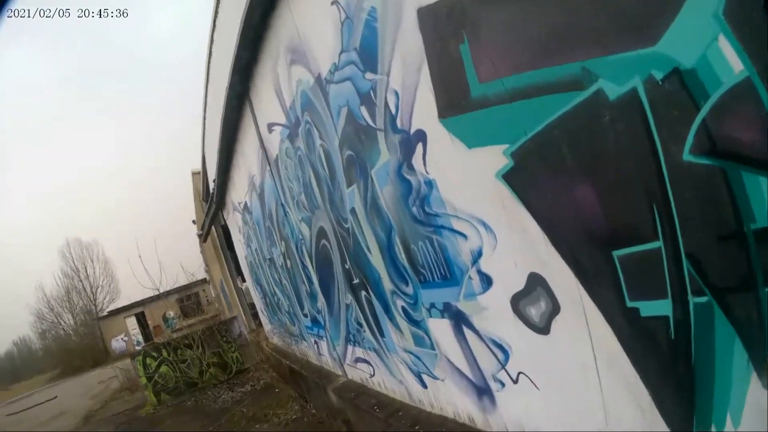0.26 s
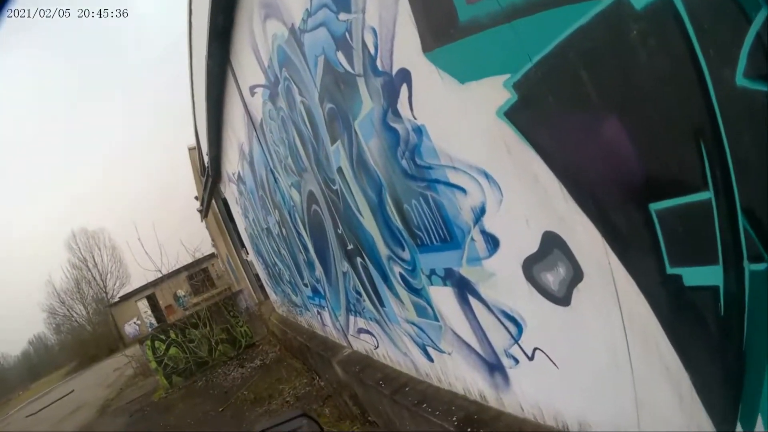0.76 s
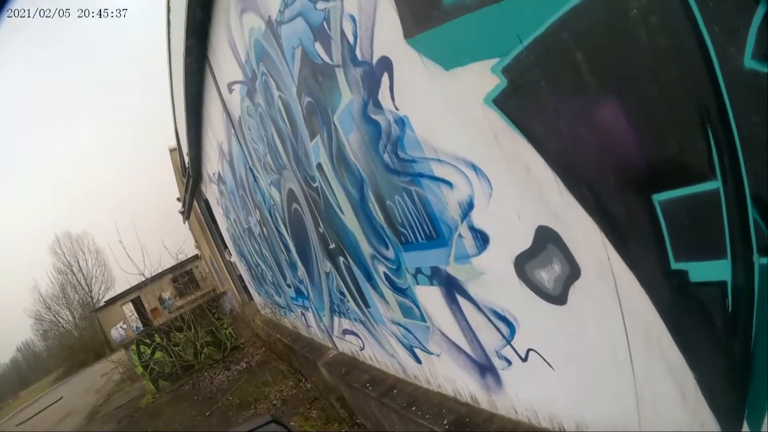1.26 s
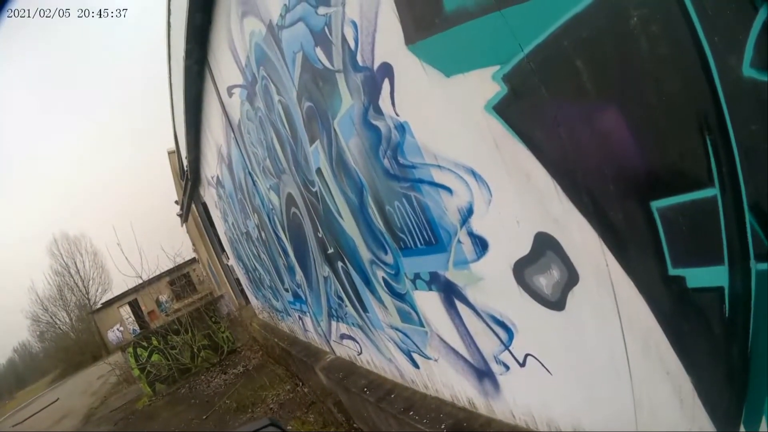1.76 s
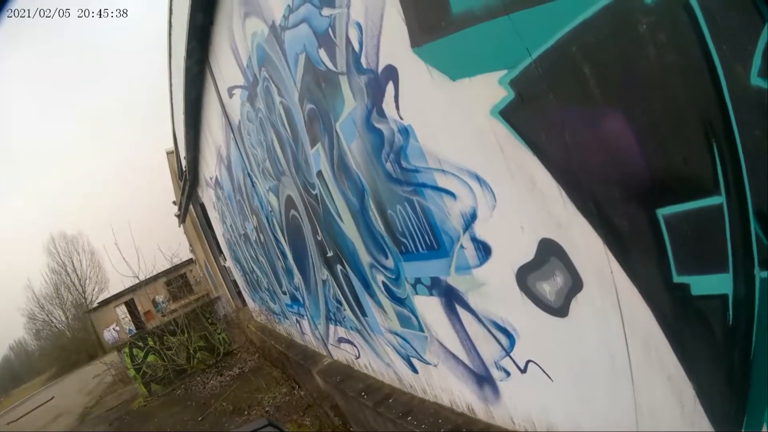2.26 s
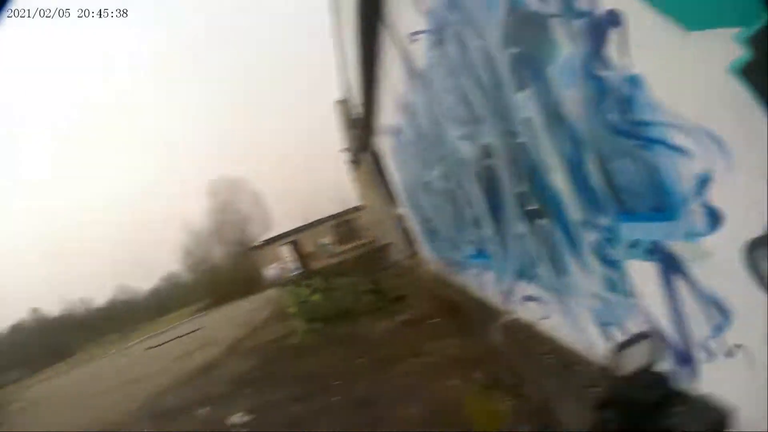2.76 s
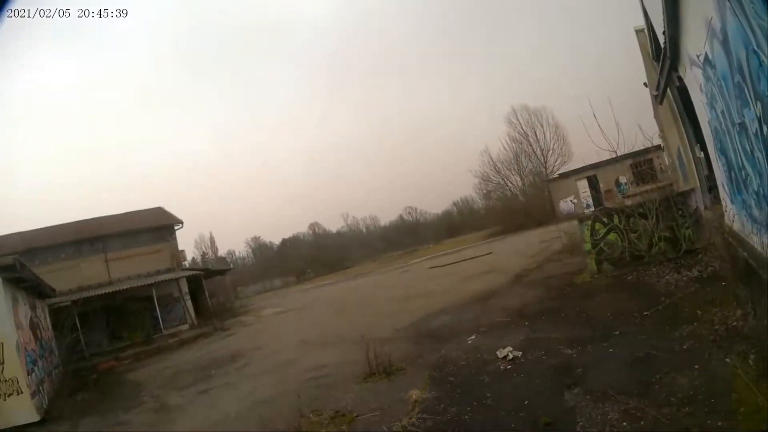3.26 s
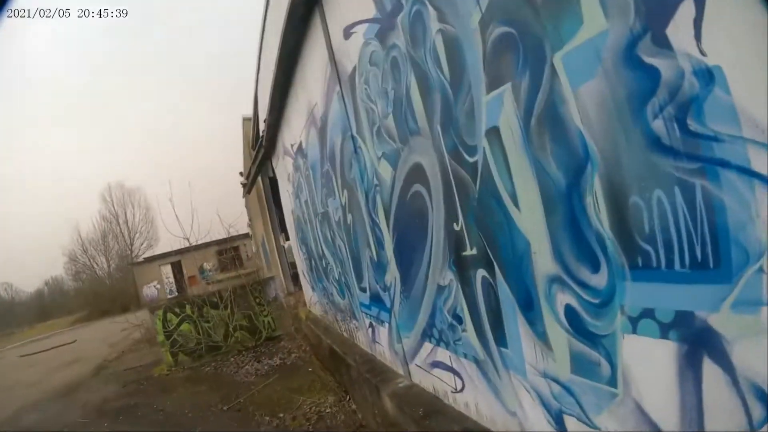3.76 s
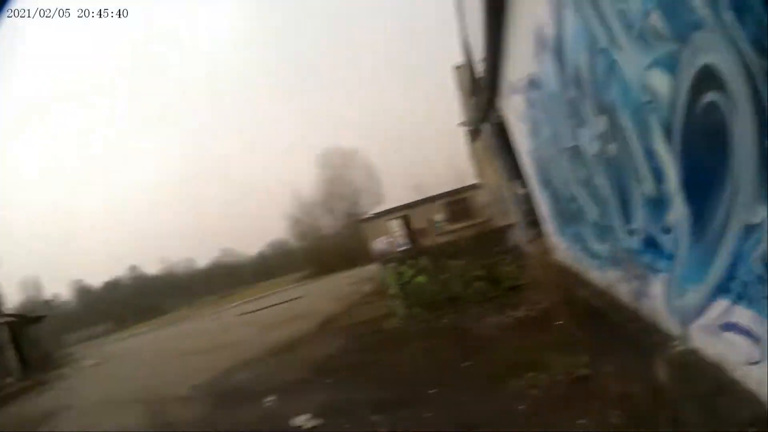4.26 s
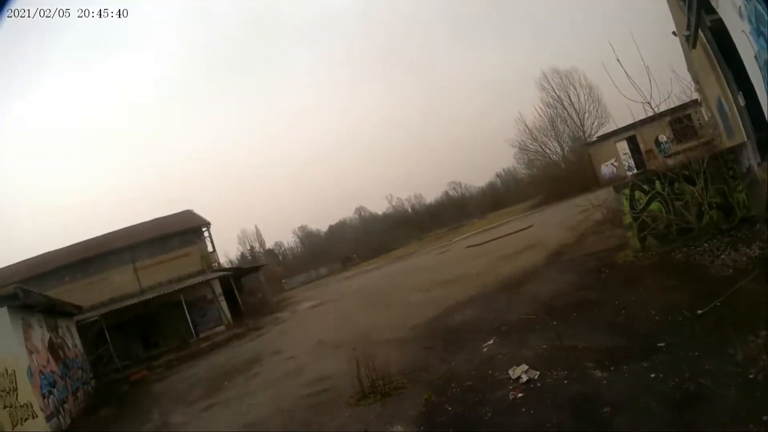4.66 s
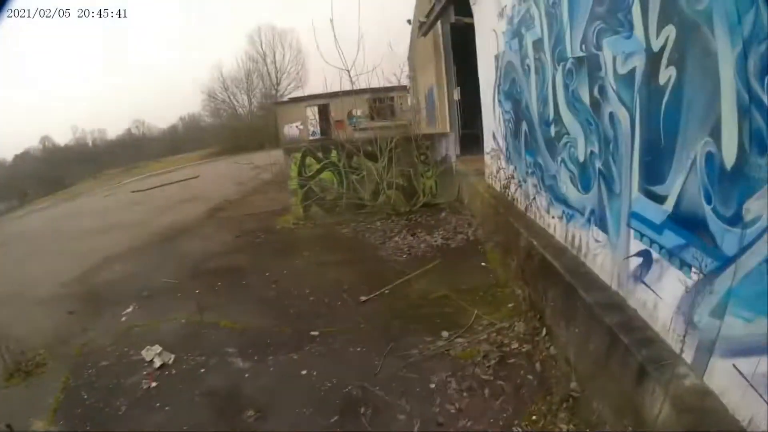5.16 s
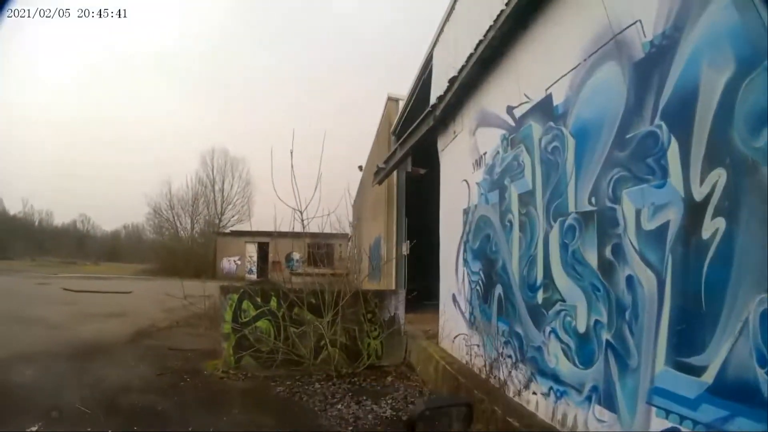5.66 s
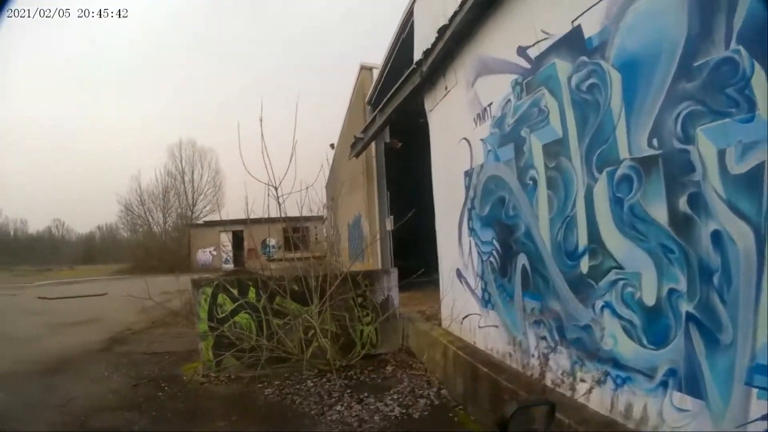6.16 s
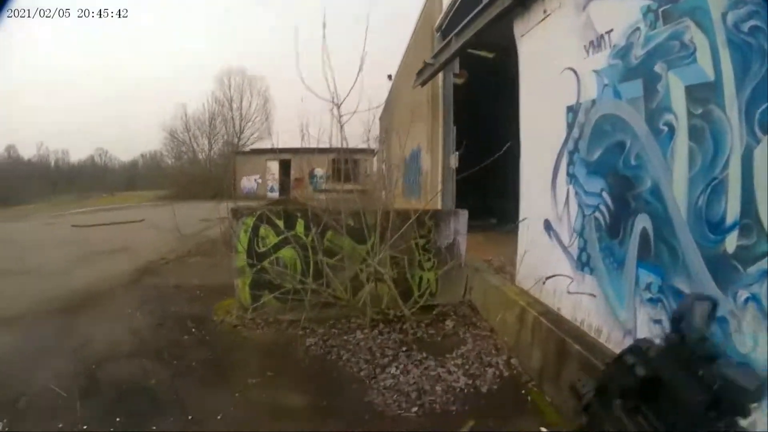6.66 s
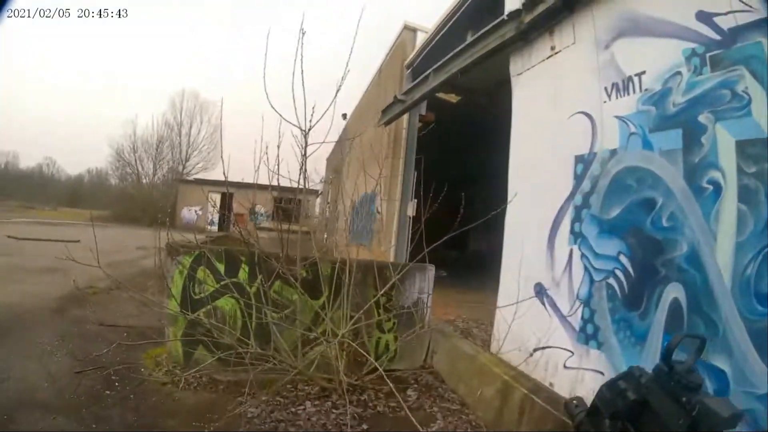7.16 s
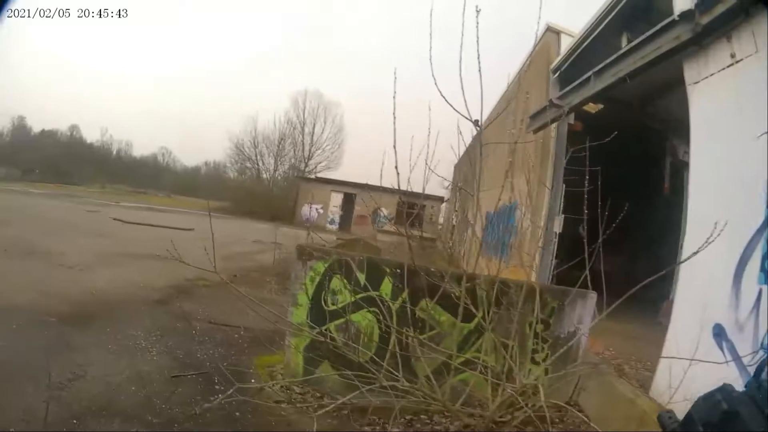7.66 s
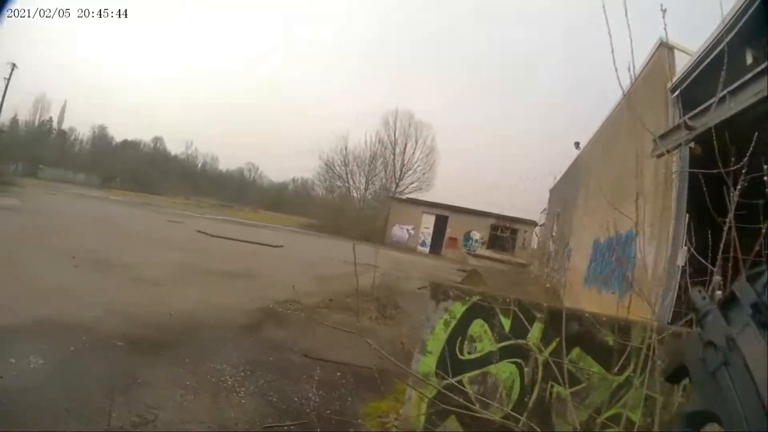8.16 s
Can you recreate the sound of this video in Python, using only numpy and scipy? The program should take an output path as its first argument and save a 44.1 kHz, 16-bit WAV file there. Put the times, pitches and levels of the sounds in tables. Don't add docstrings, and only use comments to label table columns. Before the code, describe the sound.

Irregular steps on gravel and rubble reach the microphone mostly as dull, boxy thuds through a plastic housing, with dry ticks, a loose buckle and brief gritty scrapes. A small flurry comes first, then near stillness, then loud jolts in clusters, easing to lighter rattles and clicks. Wind buffets low, cloth rustles, distant birds whistle thinly; the sound is close, muffled and mono.

```python
import sys
import numpy as np
from scipy import signal
from scipy.fft import rfft, irfft
from scipy.io import wavfile
from scipy.ndimage import uniform_filter1d, minimum_filter1d

SR = 44100
rng = np.random.default_rng(int(sys.argv[2]) if len(sys.argv) > 2 else 0)


def bounce(signal):
    frames = np.transpose(np.atleast_2d(signal))
    limited = np.clip(frames, -1, 1)
    pcm = np.round(limited * 32767).astype(np.int16)
    wavfile.write(sys.argv[1], SR, pcm)


def gain_from_db(level_db):
    decades = np.asarray(level_db, float) / 20
    return 10 ** decades


N = 370966

# f/Hz, width/Hz, level/dB
SHELL = [(485, 154, 4), (722, 374, 2), (225, 140, -4.5)]
# f/Hz, width/Hz, level/dB
CLOTH = [(1250, 450, 0), (1750, 450, -5), (2280, 400, -4.5), (2800, 450, -17)]
# f/Hz, width/Hz, level/dB
PORT = [(3300, 450, 0), (3850, 450, -1), (4800, 500, -2), (5500, 700, -5), (6800, 1200, -12)]


def unit(x):
    return x / np.sqrt(np.mean(x ** 2))


def band(x, hz, width):
    return signal.lfilter(*signal.iirpeak(hz, hz / width, SR), x)


def body(x, modes):
    out = 0
    for k, (hz, width, db) in enumerate(modes):
        out = out + (-1) ** k * gain_from_db(db) * band(x, hz, width)
    return out


def steep(x, modes):
    out = 0
    for k, (hz, width, db) in enumerate(modes):
        out = out + (-1) ** k * gain_from_db(db) * band(band(x, hz, width), hz, 1.5 * width)
    return out


def curve(s, values):
    return np.interp(np.arange(N) / SR, s, values)


def add(out, s, sound):
    i = int(s * SR)
    out[i:i + len(sound)] += sound[:N - i]


def walk(rate):
    k = int(SR / rate)
    steps = np.repeat(rng.standard_normal(N // k + 1), k)
    return uniform_filter1d(uniform_filter1d(steps, k), k)[:N]


def grains(rate, spread_db, smooth):
    happens = rng.random(N) < rate / SR
    size = happens * gain_from_db(np.minimum(spread_db * rng.exponential(size=N), 12))
    tails = signal.lfilter([1], [1, -np.exp(-1 / (0.0038 * SR))], size)
    return unit((unit(tails) + smooth) * rng.standard_normal(N))


def burst(u):
    return np.minimum(6 * u, 1) * np.exp(-u ** 2)


def hiss():
    # f/Hz, level/dB per Hz
    colour = [(12, -53.5), (25, -5), (63, -9.5), (151, -19), (729, -27.5), (2120, -44), (13200, -46.5),
              (16500, -43.5)]
    hz, db = np.transpose(colour)
    noise_hz = np.arange(N // 2 + 1) * SR / N
    gain = gain_from_db(np.interp(np.log(noise_hz + 1), np.log(hz), db))
    noise = unit(irfft(rfft(rng.standard_normal(N)) * gain, N))
    whine = unit(band(rng.standard_normal(N), 9860, 70))
    return gain_from_db(-58) * noise + gain_from_db(-88) * whine


def wind():
    # t/s, level/dB
    gusts = [(0.0, -55), (0.37, -56), (0.59, -58), (2.51, -63.5), (2.9, -48.5), (3.3, -59), (3.56, -43.5),
             (3.98, -59.5), (4.35, -47), (4.75, -55), (5.05, -44.5), (5.48, -59), (6.6, -52), (6.82, -46),
             (7.21, -58), (7.75, -49.5), (8.22, -54.5), (8.41, -50.5)]
    s, db = np.transpose(gusts)
    rumble_modes = [(28.0, 38.7, 3.5), (75.0, 42.5, 4.0), (130.6, 89, -5.5), (298, 188, -13.5)]
    rumble = body(rng.standard_normal(N), rumble_modes)
    return gain_from_db(curve(s, db) - 1.0 + 2.8 * walk(12.0)) * unit(rumble)


def rubbing():
    # t/s, rubbing level/dB
    motion = [(0.0, -58), (0.37, -51), (0.59, -55.5), (1.29, -67), (2.51, -67), (2.9, -53.5), (3.3, -55.5),
              (3.56, -51), (3.98, -54), (4.47, -50), (4.75, -53), (5.11, -50), (5.48, -58.5), (6.6, -62.5),
              (6.82, -54.5), (7.21, -60.5), (7.75, -59.5), (8.219, -61.5)]
    s, shell_db = np.transpose(motion)
    cloth_db = -71.5 + 0.98 * (shell_db + 58.5)
    fine_db = -78 + 0.78 * (shell_db + 58.5)
    slips = grains(280, 7.8, smooth=2.1)
    rustle = grains(710, 2.6, smooth=0.8)
    shell = gain_from_db(curve(s, shell_db) - 3.0) * unit(body(slips, SHELL))
    cloth = gain_from_db(curve(s, cloth_db) + 3.0) * unit(steep(slips, CLOTH))
    fine = gain_from_db(curve(s, fine_db)) * unit(steep(rustle, PORT[:2] + [(4740, 380, -0.5)]))
    flutter = gain_from_db(2.2 * walk(14))
    return flutter * (shell + cloth + fine)


def jolts():
    # t/s, peak level/dB, shell f/Hz, hardness/dB, swell/ms
    sharp = [(0.148, -23.5, 495, -14.5, 5), (0.295, -31, 540, -7, 1.2), (2.721, -32, 550, -9.5, 7),
             (2.936, -10, 562, -11.5, 2.9), (2.952, -22.5, 460, -10, 3), (3.3998, -12, 538, -10, 2.1),
             (3.407, -25, 550, -1, 0.98), (3.467, -25.5, 487, -22, 3), (4.173, -29, 485, -9, 1.8),
             (4.424, -2.5, 511, -12.5, 4.1), (4.459, -15.5, 580, -16, 2.1), (4.968, -11, 524, -7.5, 2.7),
             (5.11, -10, 460, -10.5, 0.52), (5.1127, -25, 486, 4.5, 0.69), (5.716, -18, 544, -8.5, 2.8),
             (5.729, -25.5, 495, -15, 3.4), (6.667, -30.5, 528, -22, 4.4), (6.762, -16, 518, -7.5, 4.4),
             (6.885, -16.5, 561, -7.5, 5.2), (7.523, -26.5, 496, -3.5, 1.2), (7.614, -17.5, 561, -13, 5.2),
             (7.845, -29, 524, -6.5, 3.9), (8.3909, -13, 543, -19, 2.4), (6.3198, -29, 520, -1.5, 1.5)]
    # t/s, peak level/dB, shell f/Hz,
    # hardness/dB, swell/ms
    blow = [
        (3.6055, -4, 560, -26, 2.0),
        (3.6099, 0, 625, -34, .9),
        (3.6115, 4, 622, -38, 1.6),
        (3.6168, -3, 575, -38, 3.4),
    ]
    # t/s, peak level/dB, shell f/Hz, swell/ms
    thuds = [(0.167, -29.5, 567, 9.5), (0.387, -35, 676, 1.2), (2.796, -27, 617, 2.2),
             (2.877, -31, 485, 4.2), (2.885, -32, 463, 5.5), (3.4104, -12.5, 585, 3.2),
             (4.435, -5.5, 586, 1.1), (4.624, -22.5, 576, 3.5), (4.644, -43, 557, 1.5),
             (5.054, -28, 487, 2.6), (5.116, 1.5, 591, 1.94), (5.233, -41, 430, 5.7), (5.46, -34, 561, 3.5),
             (5.64, -36, 456, 5), (5.678, -42, 566, 11), (6.19, -42.5, 550, 4.3), (6.235, -40.5, 571, 19),
             (6.298, -20.5, 488, 3), (6.3228, -14.5, 534, 2.7), (6.338, -34, 573, 6),
             (6.919, -41, 604, 2.8), (7.533, -23, 573, 6.6)]
    # t/s, peak level/dB, shell f/Hz, hardness/dB
    taps = [(0.232, -36.5, 580, -1), (3.109, -35.5, 607, -30), (4.385, -40, 614, -3),
            (4.511, -38.5, 506, -3.5), (4.524, -45, 613, -2), (4.812, -36, 580, -12),
            (5.285, -39.5, 700, -25), (5.581, -33, 586, -7), (6.35, -37.5, 550, -0.5),
            (6.509, -31.5, 564, -7.5), (6.635, -36, 568, -18.5), (6.742, -37, 560, -24),
            (6.796, -43, 576, 0), (6.854, -36, 480, -22), (7.008, -43, 553, -19), (7.313, -43.5, 677, -5),
            (7.432, -33, 525, -12), (7.492, -44, 600, -5), (7.683, -42, 580, -24),
            (7.891, -34.5, 570, -9.5), (7.989, -30.5, 586, -12.5), (6.679, -41, 566, -5),
            (6.699, -46, 565, -9), (7.548, -47, 570, -9), (7.567, -47, 603, -15), (5.7, -43, 520, -20),
            (8.27, -47, 570, -8), (8.299, -40.5, 556, -11), (8.315, -49, 606, -9), (8.35, -38.5, 587, -24),
            (0.427, -46, 596, 1), (0.488, -49, 646, -11)]

    def share(base_db, loss, db):
        return base_db - loss * (db + 33.0)

    table = []  # t/s, level/dB, shell f/Hz, upper tone/dB, hardness/dB, swell/ms
    for s, db, hz, hard_db, ms in sharp + blow:
        table.append((s, db, hz, share(-6.5, 0.36, db), hard_db, ms))
    for s, db, hz, ms in thuds:
        table.append((s, db, hz, share(-29, 0.61, db), share(-16, 0.7, db), ms))
    for s, db, hz, hard_db in taps:
        table.append((s, db, hz, share(-10.5, 0.23, db), hard_db, 4.4))
    return table


def knocks():
    # f/Hz, level/dB, time to fall by 60 dB/s
    hard_modes = [(1280, 0, .02), (1830, -9, .013), (2290, -5, .014), (3100, -18, .01), (3950, -17, .022)]
    out, rattle = np.zeros(N), np.zeros(N)
    t = np.arange(SR // 8) / SR
    contact = np.sin(np.pi / 2 * np.minimum(t / 0.00068, 1)) ** 2
    table = jolts()
    chances = rng.standard_normal((len(table), 16))
    for (s, db, hz, upper_db, hard_db, swell_ms), chance in zip(table, chances):
        u = t / (max(swell_ms, .5) / 1000)
        shell = gain_from_db(-7.5) * u * np.exp(1 - u) * np.sin(2 * np.pi * hz * t)
        upper_hz = 770 * (1 + 0.064 * chance[0])
        upper = np.exp(-t / 0.0063) * np.sin(2 * np.pi * upper_hz * t)
        detune, scatter_db = 1 + .02 * chance[8:13], 1.8 * chance[2:7]
        hard = 0
        for k, (f, g, t60) in enumerate(hard_modes):
            tone = np.sin(2 * np.pi * f * detune[k] * t)
            hard = hard + gain_from_db(g + scatter_db[k]) * 1000 ** (-t / t60) * tone
        thump = np.exp(-t / 0.013) * np.sin(2 * np.pi * 190 * gain_from_db(2.4 * chance[14]) * t)
        ring = shell + gain_from_db(upper_db + 6.5) * upper + gain_from_db(hard_db + 4.5) * hard + gain_from_db(-24) * thump
        add(out, s - .0004, -gain_from_db(db) * contact * ring)
        rattle_db = min(db - 0.25 * (db + 22.5), -23)
        add(rattle, s, gain_from_db(rattle_db) * contact * np.exp(-t / 0.013))
    chatter = grains(330, 3.2, smooth=0.52)
    shell_chatter = gain_from_db(-11.0) * unit(steep(chatter, SHELL))
    cloth_chatter = gain_from_db(-38.5) * unit(steep(chatter, CLOTH))
    return out + rattle * (shell_chatter + cloth_chatter)


def ticks():
    # t/s, peak level/dB, f/Hz, push on the shell/dB
    small = [(0.169, -57, 4040, 11), (0.3026, -50, 5840, -6), (2.8012, -34, 4900, -21),
             (3.1242, -41, 3800, -1.5), (3.4843, -52, 3440, 9), (3.6215, -54.5, 3700, 22),
             (3.8, -53, 3130, -19), (4.002, -55, 3600, -12), (4.377, -55, 3100, 6), (4.588, -47, 3570, 2.5),
             (4.6033, -51, 3200, -11), (5.065, -42.5, 3660, 5.5), (5.1119, -49.5, 3360, 22),
             (5.1495, -52, 3970, -6), (5.5029, -57, 5500, -13), (5.737, -49.5, 3340, -13),
             (6.14, -42, 3740, -12), (6.236, -41.5, 3800, -3), (6.3592, -58, 5400, 8),
             (6.5237, -43.5, 3280, 3), (6.571, -55, 3440, 1), (6.825, -47.5, 3740, -1),
             (6.895, -48, 4630, -15), (6.903, -48, 3950, -8), (2.804, -47, 4800, -10),
             (3.492, -55, 3400, -4), (4.457, -50, 5070, -10), (6.939, -50.5, 3420, -3),
             (6.946, -54, 3410, 2), (7.0506, -43.5, 4030, -3.5), (7.1818, -46, 3400, -18),
             (7.313, -42, 4400, -6.5), (7.487, -47, 3700, -9), (7.741, -50.5, 3700, 0),
             (0.374, -55, 3600, -4), (0.385, -55, 3300, -8), (0.427, -58, 3500, -6), (4.23, -40, 3400, -21),
             (4.268, -59, 3900, -19), (4.282, -51, 3400, -15), (4.318, -48, 3740, -10)]
    # t/s, peak level/dB, f/Hz, length/ms, airborne snap/dB
    cracks = [(0.233, -39.5, 3000, 5.1, -36), (2.7971, -24.5, 5000, 1.6, -6),
              (2.9474, -31, 3330, 0.69, -27), (2.9527, -34.5, 3970, 3.1, -12), (3.398, -49, 3760, 3, -30),
              (3.4082, -40.5, 4630, 1.3, -8), (3.412, -39.5, 3430, 3.7, -26),
              (3.605, -23, 2230, 3.4, -20.5), (3.6102, -23.5, 3540, 2.6, -19),
              (3.618, -26.5, 4770, 1.8, -7.5), (3.6218, -31, 5000, 1.3, -11), (3.6233, -32, 4500, 2.2, -14),
              (3.637, -49, 3700, 3.5, -15), (4.1824, -46, 3100, 4.3, -28), (4.218, -46, 3300, 3.2, -29),
              (4.436, -37, 3620, 7.5, -22), (4.443, -38.5, 3190, 1.7, -2.5), (4.9778, -39, 2780, 5.3, -23),
              (5.1093, -38, 6060, 1.6, -16), (5.1128, -24.5, 2920, 3.9, -24), (5.116, -34, 3800, 2.5, -17),
              (5.1235, -38, 5000, 1.2, -15), (5.127, -31.5, 4900, 1.3, -15), (5.729, -40.5, 3120, 7, -24),
              (6.32, -41.5, 3100, 3.5, -32), (6.772, -35, 3620, 1.6, -18), (7.446, -44, 3100, 3.5, -35),
              (7.628, -37, 2960, 2.4, -19), (7.855, -46, 2900, 5.3, -37), (8.4044, -35, 5230, 1.7, -23)]
    table = [(s, db, hz, ms, air_db, -13.5) for s, db, hz, ms, air_db in cracks]
    table += [(s, db, hz, 2.04, -25.5, push_db) for s, db, hz, push_db in small]
    out, t = np.zeros(N), np.arange(SR // 20) / SR
    push = np.sin(np.pi * np.minimum(t / 0.0035, 1)) ** 2
    noises = rng.standard_normal((len(table), len(t)))
    for (s, db, hz, ms, air_db, push_db), noise in zip(table, noises):
        crack = noise * np.exp(-(t / (max(ms, .2) / 700)) ** 2)
        ring = steep(crack, PORT) + gain_from_db(6.5) * steep(crack, [(hz, 700, 0)])
        air = steep(crack, [(7840, 3100, 5.5), (11300, 2400, -2), (15200, 2700, -6.0)])
        ring = ring / np.ptp(ring) * 2
        air = air / np.ptp(air) * 2
        add(out, s, gain_from_db(db) * (ring + gain_from_db(air_db) * air + gain_from_db(push_db + 10.5) * push))
    return out


def buckle():
    # t/s, peak level/dB
    hits = [
        (0.2345, -52),
        (3.604, -41.5),
        (5.5797, -63),
        (6.6652, -45.5),
        (7.5223, -40.5),
    ]
    # f/Hz, level/dB, time to fall by 60 dB/s
    modes = [(1190, 17, 0.025), (1810, 16, 0.031), (2000, 9, 0.04), (2570, -10, 0.029), (3100, -8, 0.045)]
    out, t = np.zeros(N), np.arange(SR // 16) / SR
    ring = sum(gain_from_db(db) * 1000 ** (-t / t60) * np.sin(2 * np.pi * hz * t) for hz, db, t60 in modes)
    for s, db in hits:
        add(out, s, gain_from_db(db + 1.0) * np.minimum(t / 0.0023, 1) * ring)
    return out


def scuffs():
    # t/s, peak level/dB, fine grit/dB, length/ms
    stones = [(0.257, -41.5, -11, 27), (0.3303, -38, -18, 17), (0.416, -43, -15, 32), (0.46, -43, -15, 33),
              (0.4844, -67, -19, 30), (0.5332, -48, -18, 46), (0.677, -43.5, -30, 10), (0.8, -42, -18, 46),
              (4.228, -34, -9, 33), (4.264, -44, -8.5, 37), (4.2894, -63, -19, 21), (4.314, -50, -3, 17),
              (6.348, -60, 0, 27), (0.371, -42, -17, 20), (7.3294, -57, -7, 19)]
    # t/s, peak level/dB, length/ms
    drags = [(0.2686, -33, 27), (2.8994, -38, 52), (3.6294, -28.5, 45), (4.3704, -30, 97),
             (5.066, -30.5, 130), (5.251, -41, 16), (6.1368, -25.5, 19.6), (6.974, -42.5, 100),
             (7.1788, -31.5, 29), (7.855, -32.5, 30), (8.262, -31.5, 59), (8.293, -53, 25),
             (8.36, -35.5, 77)]
    grit = grains(260, 4.5, smooth=.4)
    layer_modes = (CLOTH[:3] + [(2017, 200, 1.5)], PORT[:4], SHELL)
    layers = [unit(steep(grit, modes)) for modes in layer_modes]
    # t/s, then level/dB of cloth, fine grit and shell, length/ms
    table = [(s, db, db + fine_db, db - 12.5, ms) for s, db, fine_db, ms in stones]
    table += [(s, db - 17.5, db - 26, db, ms) for s, db, ms in drags]
    gains, t = np.zeros((3, N)), np.arange(SR // 4) / SR
    for s, *levels_db, ms in table:
        shape = burst(t / (max(ms, 4) / 1000))
        for gain, layer_db in zip(gains, levels_db):
            add(gain, s, gain_from_db(layer_db - 11.5) * shape)
    return np.sum(gains * layers, axis=0)


def sprays():
    # t/s, peak level/dB, f/Hz, length/ms
    table = [(0.268, -60, 4700, 16), (0.299, -70, 5640, 30), (0.328, -61, 3480, 16), (0.368, -60, 3660, 10),
             (0.423, -65, 3530, 56), (0.425, -59, 2070, 70), (0.545, -62, 2120, 30), (0.5, -71, 4300, 15),
             (3.65, -71, 2400, 250), (3.65, -74, 3520, 210), (4.23, -55.5, 3900, 18),
             (4.264, -51, 3560, 42), (4.314, -49.5, 2000, 13), (4.328, -61, 3550, 35),
             (5.129, -51, 4900, 4.7), (6.35, -60, 5300, 24), (6.384, -73, 5340, 10), (8.29, -69, 2300, 25)]
    out, grit = np.zeros(N), grains(290, 7.4, smooth=.6)
    for s, db, hz, ms in table:
        length = max(ms, 4) / 1000 * SR
        u = np.arange(int(2.5 * max(ms, 4) / 1000 * SR)) / length
        piece = grit[int(s * SR):][:len(u)]
        ring = unit(steep(piece, [(hz, hz / 6, 0)]))
        add(out, s, gain_from_db(db) * burst(u) * ring)
    return out


def bird():
    # t/s, start f/Hz, length/s, level/dB
    chirps = [(1.28, 3660, .09, -78), (3.68, 4760, .08, -88), (3.82, 4780, .1, -86), (4.0, 4760, .1, -87),
              (4.85, 4860, .06, -82), (4.92, 4880, .06, -77), (5.29, 4830, .07, -77),
              (5.41, 4790, .09, -79), (5.56, 3600, .05, -82), (5.745, 4840, .07, -78),
              (5.815, 4830, .06, -80), (5.87, 4800, .075, -80), (6.015, 3600, .07, -84),
              (6.02, 4790, .04, -85), (6.195, 4800, .08, -79), (6.335, 4750, .09, -82),
              (6.47, 4720, .05, -80)]
    # t/s, start f/Hz, end f/Hz, length/s, level/dB
    coo = (5.83, 458, 474, .3, -66)
    fall = .024
    calls = [(s, hz, hz * (1 - fall), length, db) for s, hz, length, db in chirps] + [coo]
    out = np.zeros(N)
    for s, start_hz, end_hz, length, db in calls:
        u = np.arange(int(length * SR)) / (length * SR)
        hz = end_hz + (start_hz - end_hz) * (1 - u) ** 2
        whistle = np.sin(2 * np.pi * np.cumsum(hz) / SR)
        add(out, s, gain_from_db(db + 6) * np.sqrt(np.sin(np.pi * u)) * whistle)
    return out * gain_from_db(2.5 * walk(40))


def snaps():
    # t/s, peak/full scale (negative is inwards)
    spikes = [(2.798, .12), (3.4087, -.08), (4.437, -.2), (5.114, -.25), (5.7305, -.13), (6.897, -.09),
              (7.524, -.09), (6.1405, -.08), (6.3198, -.05), (6.525, -.07), (6.772, -.12), (7.1825, -.055),
              (7.193, -.03), (7.448, -.08), (7.6275, -.16)]
    out = np.zeros(N)
    for s, peak in spikes:
        add(out, s - .0006, peak * np.hanning(int(.0013 * SR)) ** 2)
    return out + gain_from_db(-10.0) * body(out, SHELL)


def scene():
    hits = knocks() + ticks() + buckle() + scuffs() + sprays() + snaps()
    return (hiss() + wind() + rubbing() + hits + bird())[None]


def starve(x):
    high_pass = signal.butter(4, 2300, "high", fs=SR, output="sos")
    high = signal.sosfiltfilt(high_pass, x)
    level = np.sqrt(uniform_filter1d(high ** 2, size=SR // 300) + 1e-18)
    near = -minimum_filter1d(-level, size=int(28 / 1000 * SR))
    faint = 1. * (level < gain_from_db(-28) * near)
    return x - .85 * high * uniform_filter1d(faint, size=SR // 500)


def top_cut(x):
    return signal.sosfilt(signal.butter(12, 16640, fs=SR, output="sos"), x)


def record(dry):
    low_pass = signal.ellip(8, .2, 30, 15750, fs=SR, output="sos")
    mix = signal.sosfilt(low_pass, starve(dry)) + .0027
    return top_cut(mix)


dry = scene()
out = record(dry)
bounce(out)
```